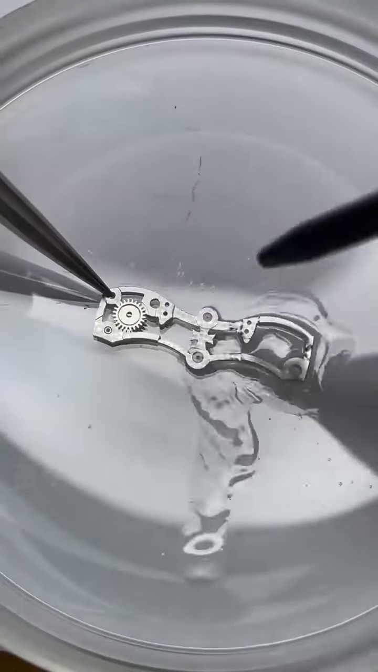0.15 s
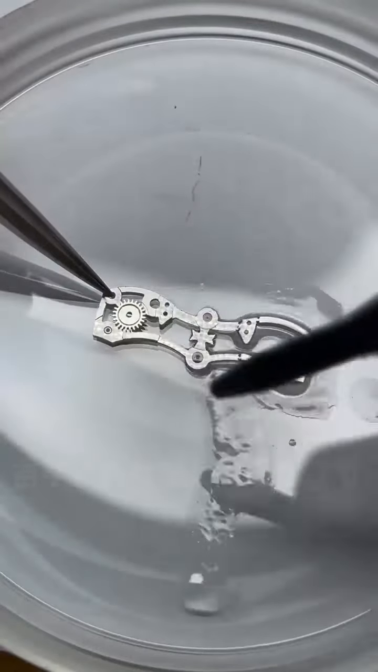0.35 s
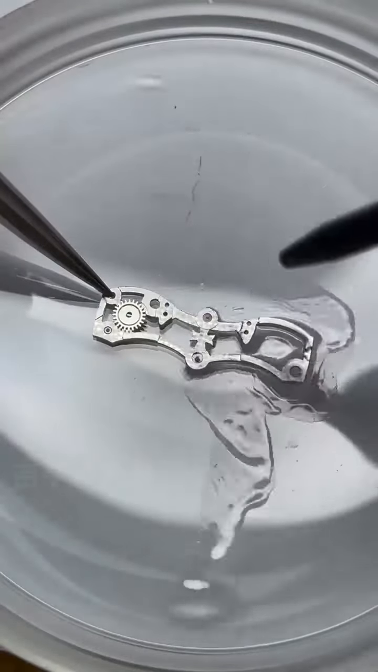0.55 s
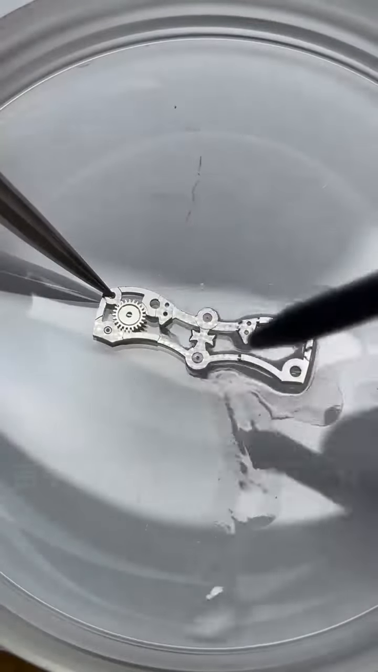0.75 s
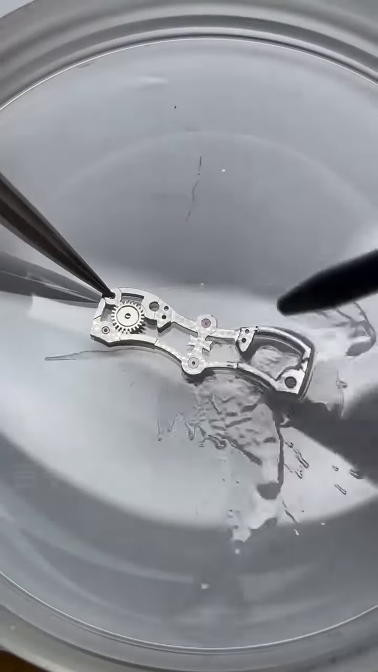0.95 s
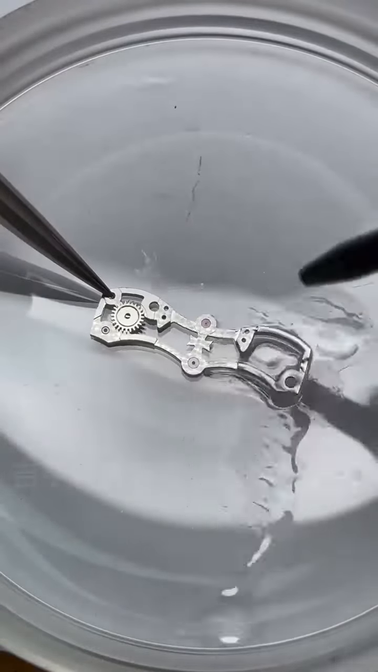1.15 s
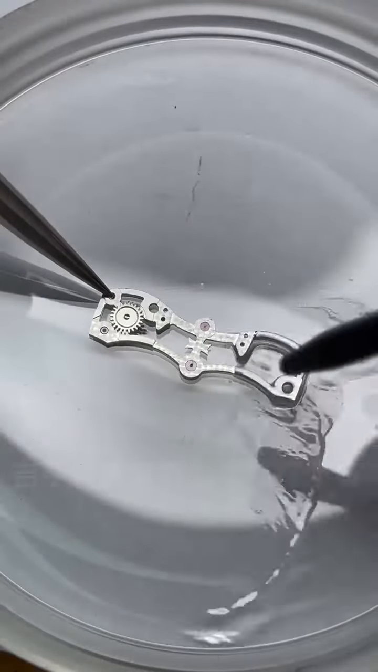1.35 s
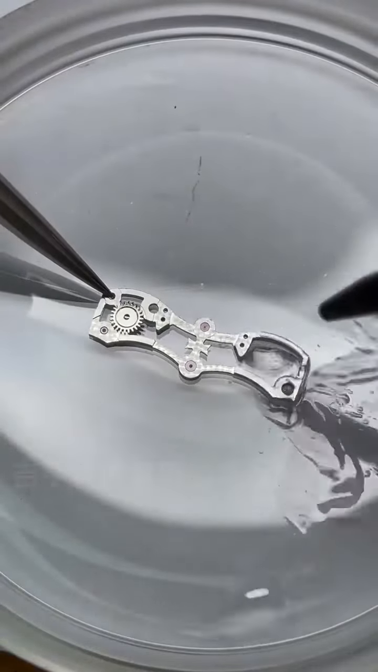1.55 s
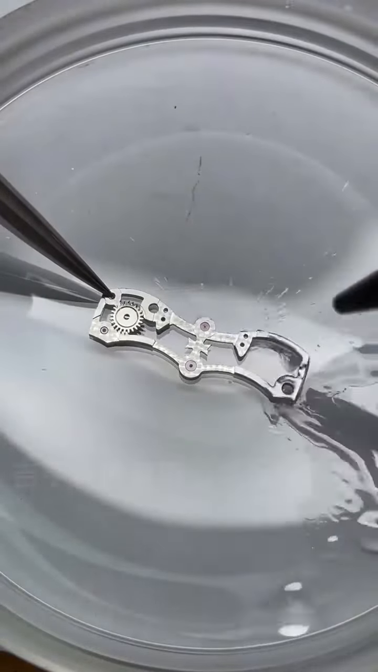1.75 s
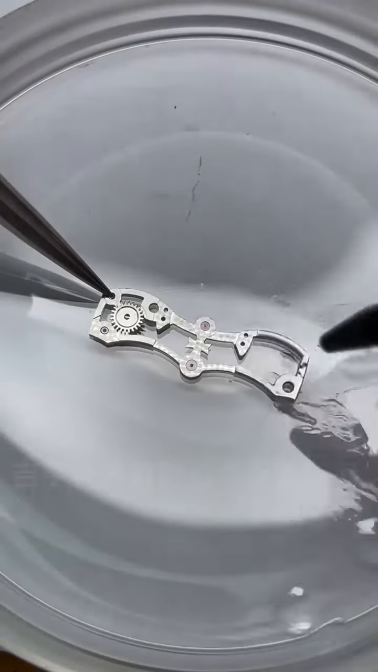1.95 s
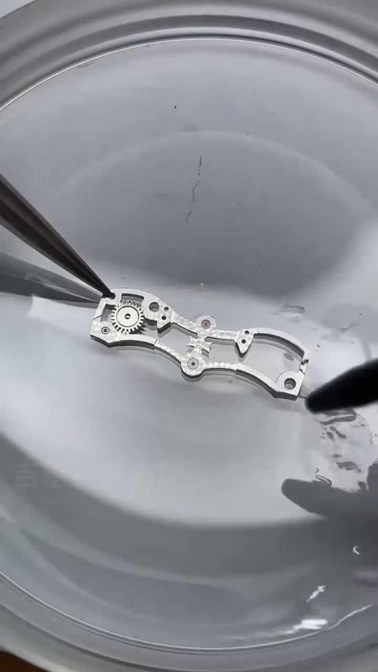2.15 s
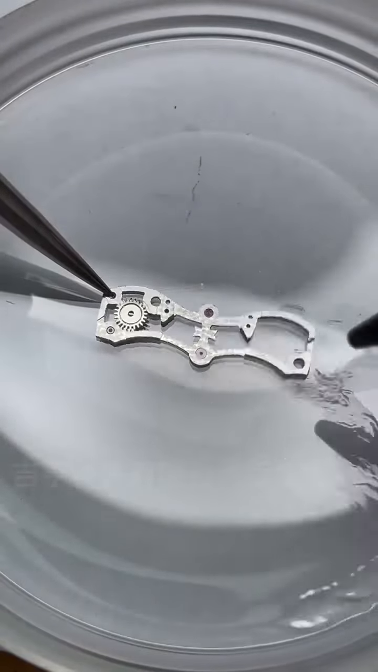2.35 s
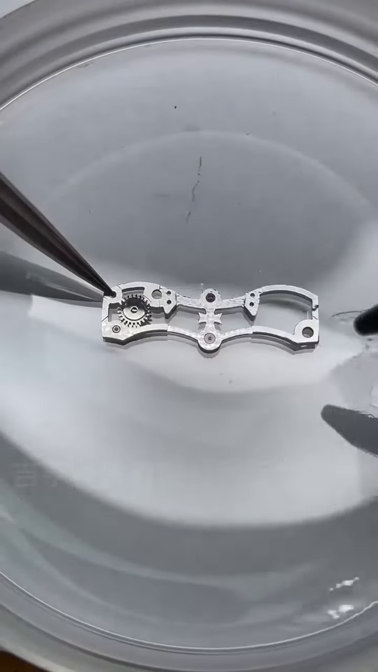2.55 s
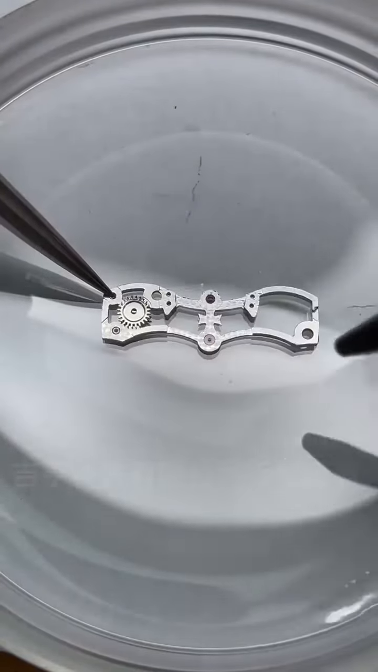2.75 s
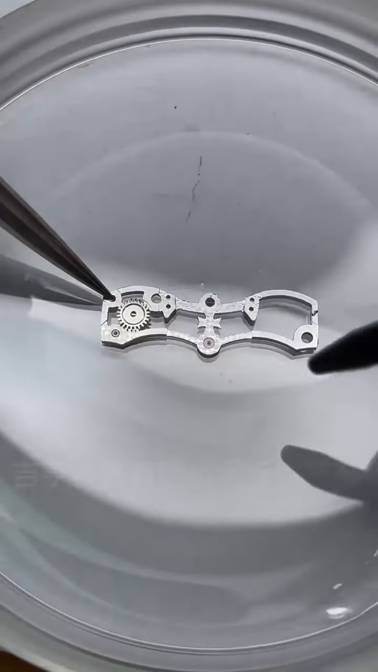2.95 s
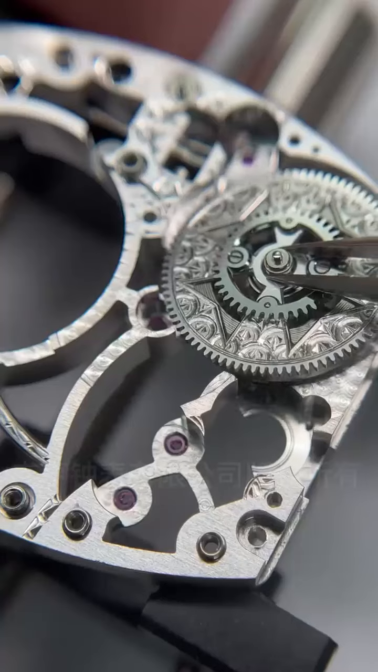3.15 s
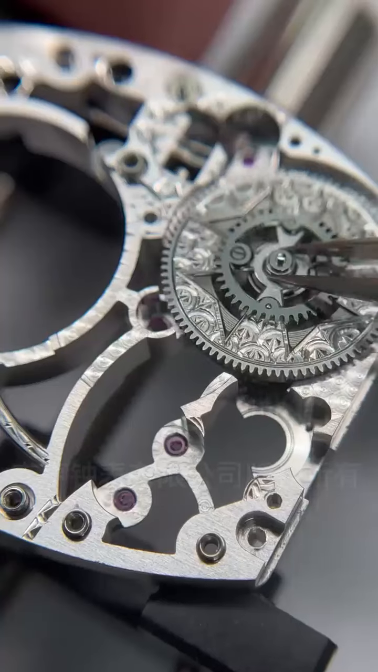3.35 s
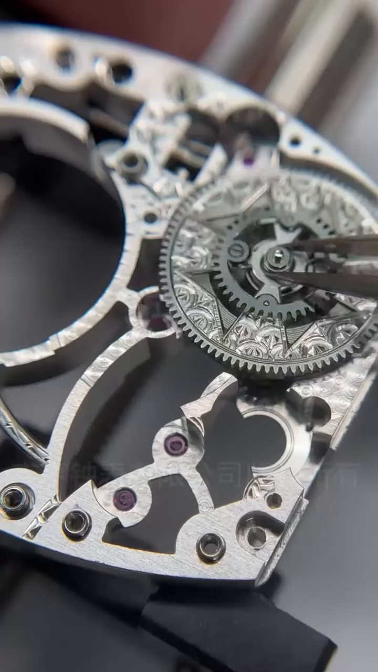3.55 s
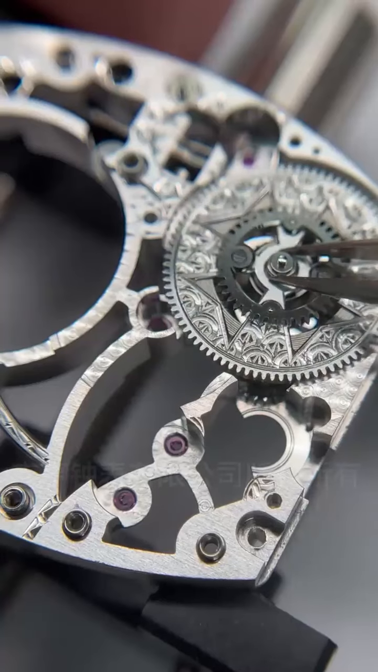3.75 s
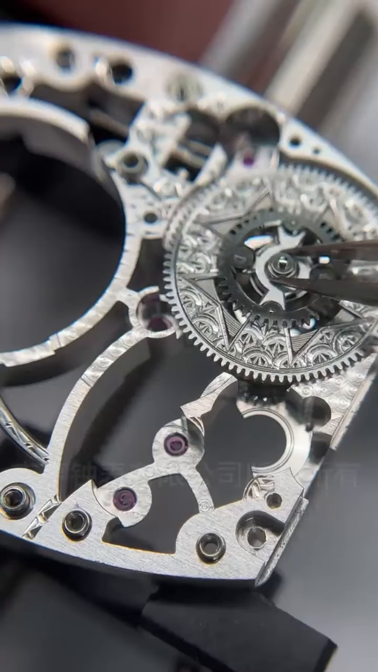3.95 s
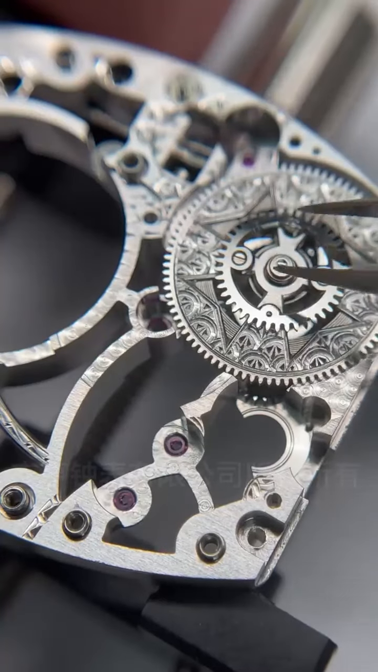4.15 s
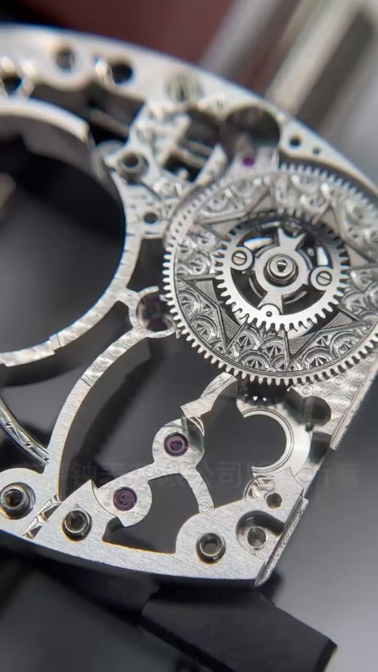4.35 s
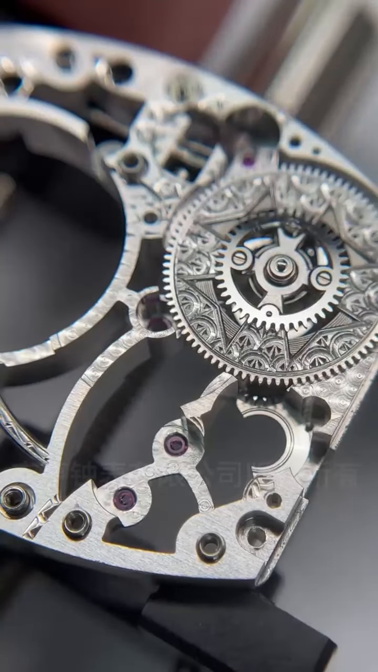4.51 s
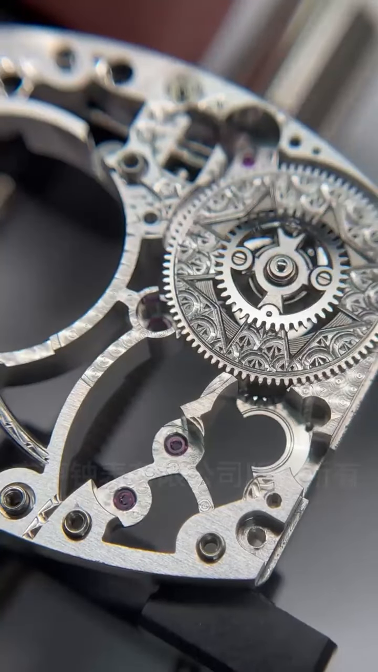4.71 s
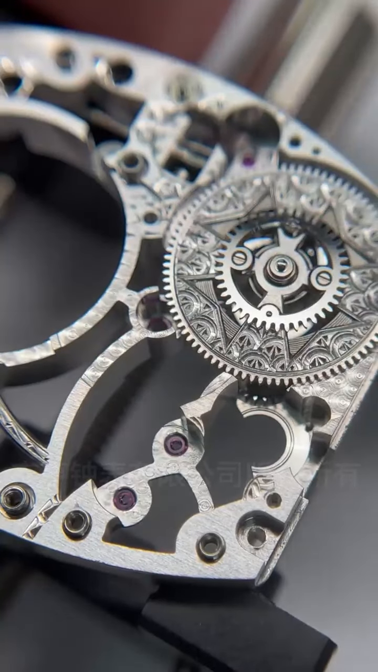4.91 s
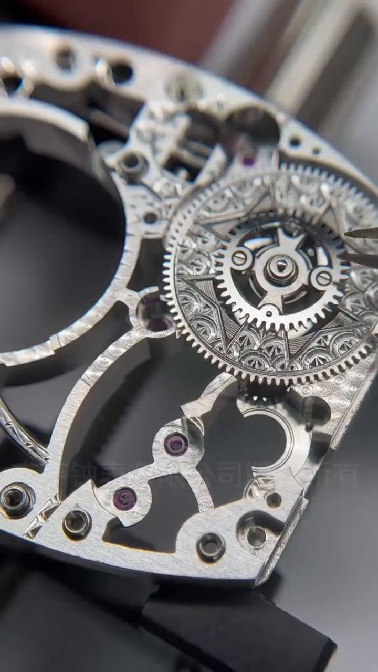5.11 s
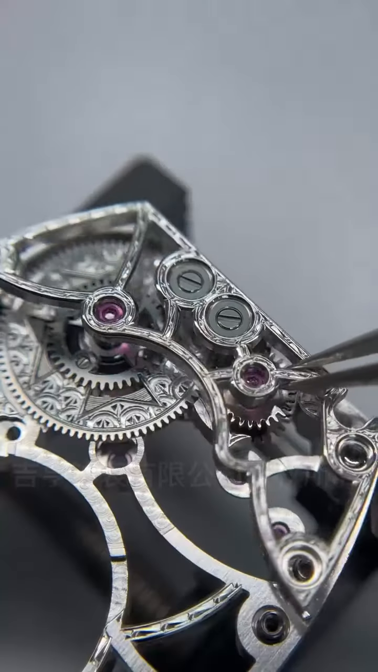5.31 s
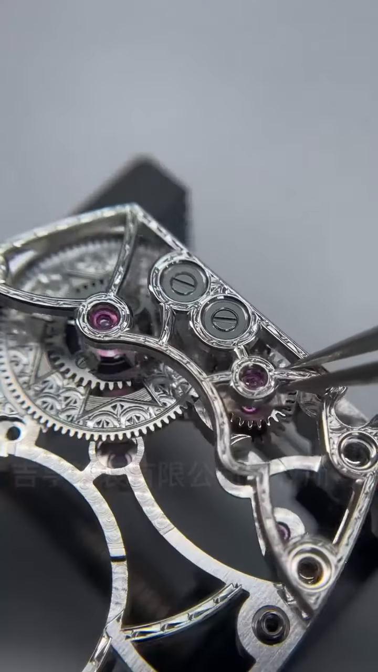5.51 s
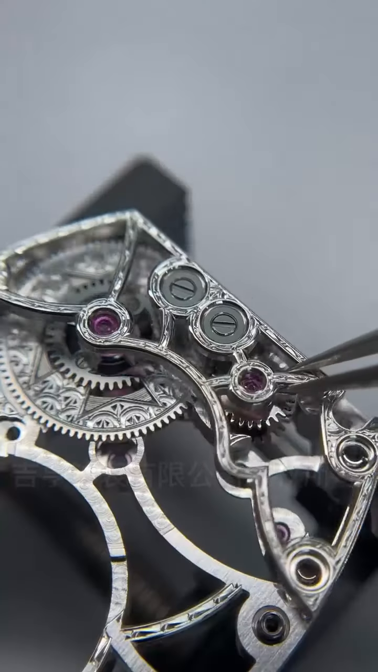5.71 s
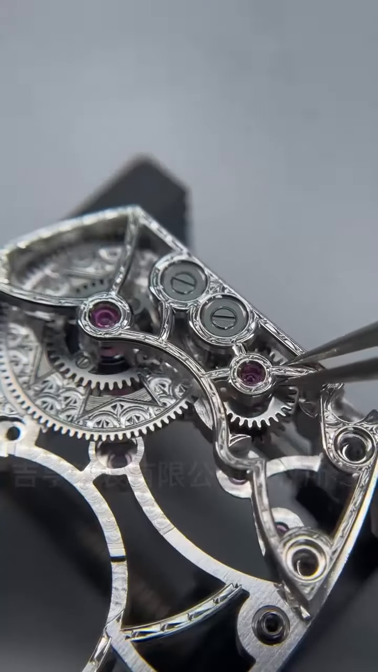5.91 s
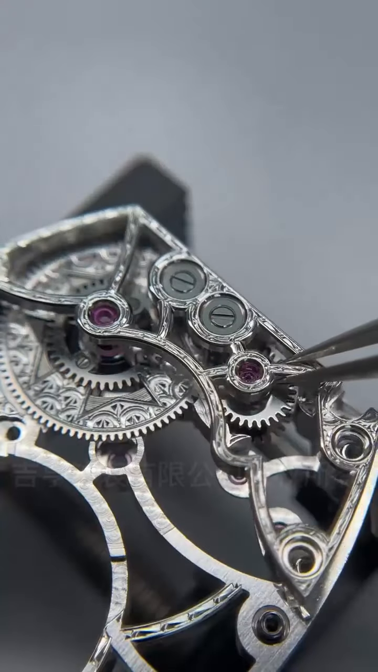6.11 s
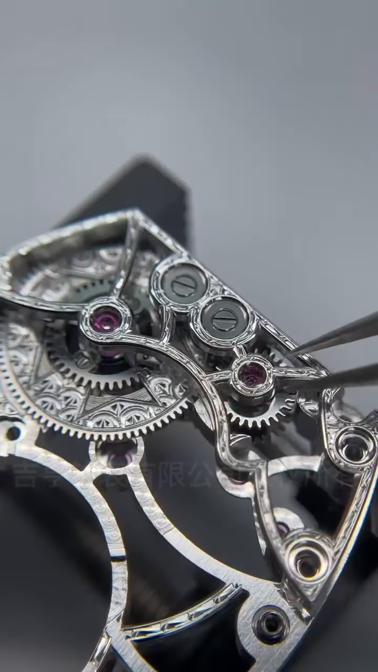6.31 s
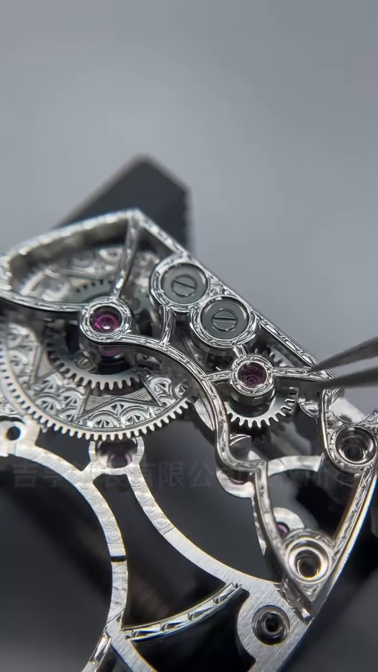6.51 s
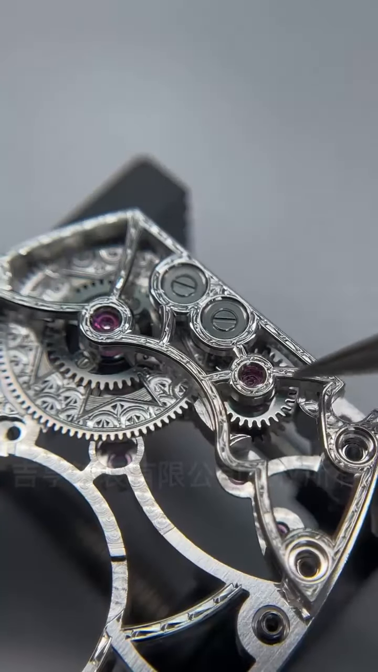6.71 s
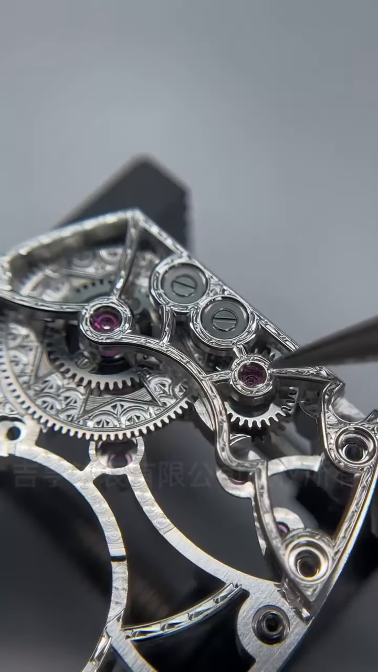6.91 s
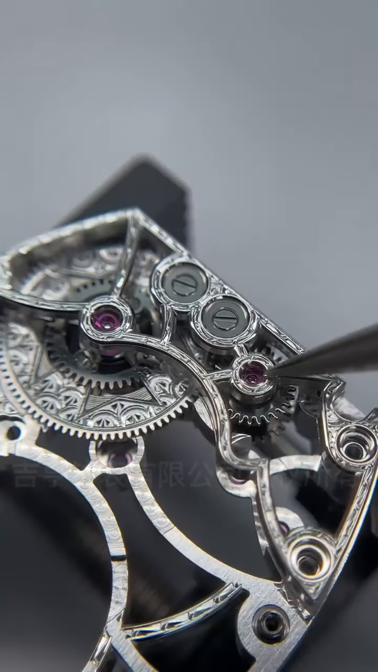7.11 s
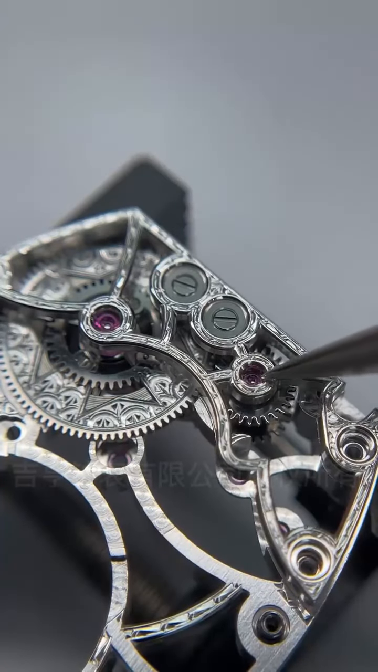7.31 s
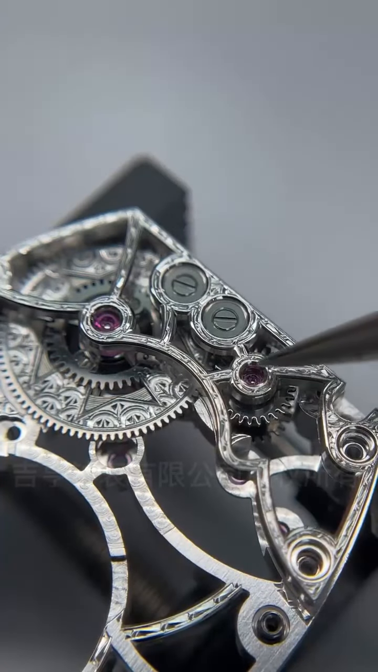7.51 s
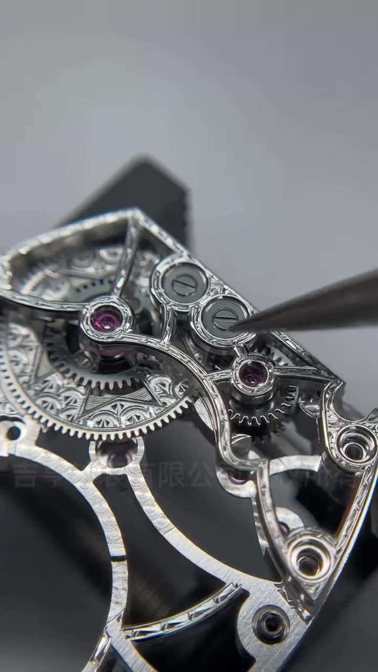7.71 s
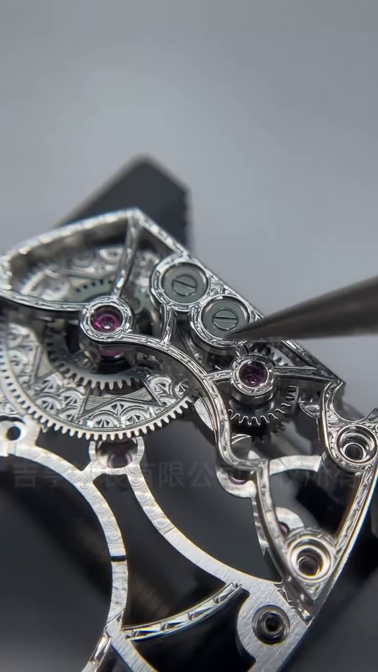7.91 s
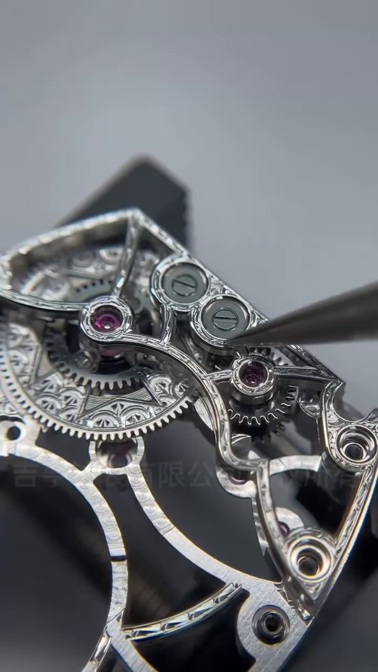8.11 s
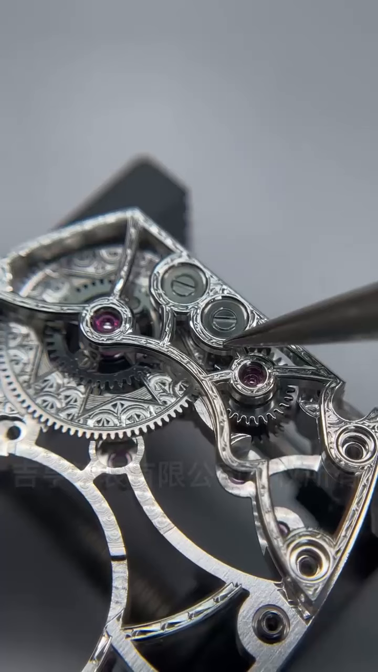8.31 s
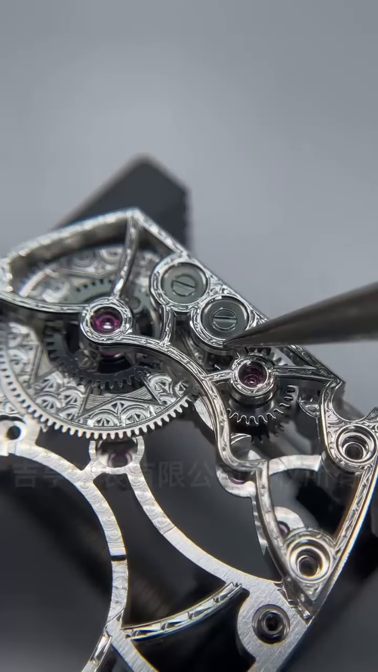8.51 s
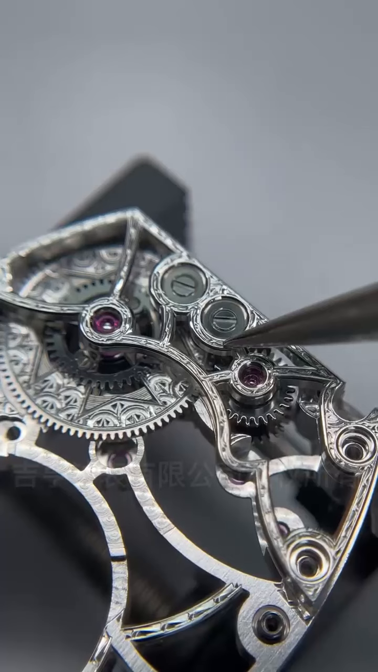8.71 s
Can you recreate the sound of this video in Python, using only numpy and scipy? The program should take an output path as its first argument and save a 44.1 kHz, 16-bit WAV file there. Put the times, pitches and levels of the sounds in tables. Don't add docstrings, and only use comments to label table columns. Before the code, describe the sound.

Nine quick, hissing scrubs in a wet dish cut to hushed room hum, where tweezers and a screwdriver click sparsely on delicate steel.

```python
import sys
import numpy as np
from scipy import signal
from scipy.fft import rfft, irfft, next_fast_len
from scipy.io import wavfile
from scipy.ndimage import uniform_filter1d, minimum_filter1d

SR = 44100
rng = np.random.default_rng(int(sys.argv[2]) if len(sys.argv) > 2 else 0)


def nominal_scale(level):
    x = np.asarray(level, float) / 20
    return 10 ** x


def waveform_to_disk(signal):
    frames = np.transpose(np.atleast_2d(signal))
    scaled = np.clip(frames, -1, 1) * 32767
    samples = np.round(scaled).astype(np.int16)
    wavfile.write(sys.argv[1], SR, samples)


N = 390725
T = np.arange(N) / SR


def noise(n=N):
    return rng.standard_normal(n)


def evened(x):
    return x / np.sqrt(np.mean(x ** 2) + 1e-20)


def slow_noise(samples):
    once = uniform_filter1d(noise(), samples)
    return evened(uniform_filter1d(once, samples))


def coloured(x, points):
    hz, db = np.transpose(points)
    size = next_fast_len(len(x))
    f = np.fft.rfftfreq(size, 1 / SR)
    curve_db = np.interp(np.log(f + 1), np.log(hz), db, -120, -120)
    return evened(irfft(rfft(x, size) * nominal_scale(curve_db), size)[:len(x)])


def add(mix, s, sound):
    part = mix[round(s * SR):][:len(sound)]
    part += sound[:len(part)]


def swells(steady_db, middle, length, db):
    bells = np.exp(-(4 * (T[::64, None] - middle) / length) ** 2 / 2)
    power = nominal_scale(2 * steady_db) + bells @ nominal_scale(2 * db)
    return np.repeat(np.sqrt(power), 64)[:N]


def grains(per_s, spread_db, clump_db, clump_s):
    slips = (rng.random(N) < per_s / SR) * noise()
    slips = slips * nominal_scale(spread_db * np.minimum(rng.exponential(1, N), 4))
    return slips * nominal_scale(clump_db * slow_noise(int(clump_s * SR)))


# start_s, length_s, fizz_db, rasp_db
BLASTS = [
    (0.085, 0.16, -25, -31.5),
    (0.429, 0.17, -25, -30.5),
    (0.748, 0.25, -23, -35),
    (1.085, 0.19, -23.5, -34.5),
    (1.405, 0.16, -23, -38.5),
    (1.672, 0.19, -24.5, -40.5),
    (1.938, 0.15, -22.5, -40),
    (2.233, 0.37, -23.5, -42.5),
    (2.592, 0.24, -24, -43.5),
]
# time_s, fizz_db, rasp_db
BETWEEN = [(0, -35, -45), (.3, -33.5, -44), (1.1, -27.5, -41), (2.2, -30, -42), (2.97, -30.5, -44.5)]


def blasting(column, change_db, lift_s):
    press_s = 0.039
    back = np.array(BETWEEN)
    power = nominal_scale(2 * np.interp(T, back[:, 0], back[:, column - 1]))
    for row in BLASTS:
        start, length, level_db = row[0], row[1], row[column]
        t = T - start
        touch = np.clip(t / press_s, 0, 1) * np.clip(1 - (t - length) / lift_s, 0, 1)
        progress = np.clip(t / length, 0, 1)
        blast = touch * nominal_scale(level_db + change_db * (progress - 1.5))
        power = np.maximum(power, blast ** 2)
    return uniform_filter1d(np.sqrt(power), 600)


# pitch_hz, level_db
FIZZ = [(7400, -38), (7850, -21), (8030, -6), (8350, -3), (9000, -4), (9500, -2.5), (9800, -4),
        (10050, -2.5), (11000, -6), (12000, -14.5), (13500, -22), (15450, -23.5), (15550, -60)]
# pitch_hz, level_db
WHISTLE = [(9500, -21.5), (9950, -1.5), (10120, 0), (10450, -5), (11000, -22)]


def fizz(slips):
    film = nominal_scale(-9 + 4.5 * (T - 4.0)) * coloured(slips, WHISTLE)
    blasts = blasting(column=2, change_db=3.5, lift_s=0.016)
    return nominal_scale(6.0) * blasts * (coloured(slips, FIZZ) + film)


# pitch_hz, width_hz, lift_db
PART = [(2775, 86, 5), (3426, 220, -2.5), (3996, 35, 3), (5350, 54, -0.5), (5940, 390, 6.5),
        (6250, 64, 3.5), (7060, 68, 2), (7145, 54, 2.5), (7417, 180, 6.5)]


def ringing(x):
    size = next_fast_len(N)
    f = np.fft.rfftfreq(size, 1 / SR)
    lift_db = sum(db / (1 + (2 * (f - hz) / width) ** 2) for hz, width, db in PART)
    return evened(irfft(rfft(x, size) * nominal_scale(lift_db), size)[:N])


# pitch_hz, level_db
RASP = [(300, -37.5), (1300, -21), (2000, -19), (3200, -7.5), (4000, -3), (4600, -6), (4800, -1),
        (5900, -4), (6400, -5), (7000, 2), (7900, -6), (9000, 2), (13000, -23), (15500, -28)]


def rasp(slips):
    blasts = blasting(column=3, change_db=-2, lift_s=.06)
    return nominal_scale(0.5) * blasts * ringing(coloured(slips, RASP))


# pitch_hz, level_db
SPRAY = [(900, -39), (1400, -6), (1900, -0.5), (2100, -3), (4000, 0.5), (7800, -4), (9000, -13.5),
         (15500, -16)]
# time_s, level_db
WETNESS = [(0, -1), (.45, 0), (.8, 1.5), (1.35, 3), (1.7, 0), (2.3, -1), (2.38, 1.5), (2.78, 1.5),
           (2.86, -1), (2.97, -2)]


def spray():
    level_db = -44.5 - 2.5 * (T - 2.0) + np.interp(T, *np.transpose(WETNESS))
    return nominal_scale(level_db) * coloured(noise(), SPRAY)


# middle_s, length_s, level_db
GUSTS = [(0.032, 0.065, -50), (0.328, .14, -54), (0.517, 0.062, -56.5), (0.658, .12, -55),
         (0.828, 0.18, -56.5), (1.012, 0.16, -49.5), (1.208, 0.14, -52), (1.346, 0.11, -49),
         (1.435, 0.11, -56), (1.637, 0.13, -52.5), (1.863, 0.088, -58), (1.965, .1, -57), (2.13, 0.18, -59),
         (2.294, 0.12, -67), (2.44, .12, -57), (2.618, 0.2, -60), (2.798, 0.27, -63)]


def gusts():
    return swells(-65, *np.transpose(GUSTS))


# pitch_hz, level_db
WIND = [(15, -53.5), (25, -12), (80, -2.5), (135, -14), (162, -14), (194, -29.5), (300, -33.5),
        (390, -53.5), (660, -120)]


def wind(gust):
    return nominal_scale(6.5) * gust * coloured(noise(), WIND)


# pitch_hz, level_db
SLOSH = [(120, -15), (200, -7), (500, -1), (1200, -3), (2000, -25.5)]


def slosh(gust):
    laps = grains(per_s=2100, spread_db=2.5, clump_db=1.5, clump_s=0.0046)
    follow = (gust / nominal_scale(-57)) ** .4
    return nominal_scale(-57 - 0.5 * (T - 0.5)) * follow * coloured(laps, SLOSH)


def puff(db, sharp_db, flutter_db, sink_ms, chance):
    t, sink = np.arange(2200) / SR, max(sink_ms, .5) / 1000
    hz = 95 + 60 * chance[0] + 1300 * np.exp(-t / sink) + 260 * np.exp(-t / (3.1 * sink))
    front = nominal_scale(sharp_db) * np.exp(-t / sink)
    body = t / sink * np.exp(-t / (2.0 * sink))
    flutter = nominal_scale(flutter_db) * np.exp(-t / 0.024) * np.minimum(t / 0.025, 1) ** 2
    swell = (front + body + flutter) * np.minimum(t / 0.00013, 1)
    wobble = np.cumsum(uniform_filter1d(noise(len(t)), 40)) * 0.11
    return nominal_scale(db + 2.0) * swell * np.sin(2 * np.pi * (np.cumsum(hz) / SR + chance[1]) + wobble)


# start_s, peak_db, flutter_db
PUFFS = [(0.015, -34.5, -1), (0.046, -45.5, -10), (0.159, -44, 0.5), (0.293, -42, 8.5), (.321, -36, -4),
         (0.365, -34.5, -7.5), (0.489, -32, -16.5), (0.52, -46, -6.5), (0.631, -42.5, 1), (0.654, -43, 2.5),
         (.67, -41.5, -4), (0.725, -41.5, 2.5), (0.788, -40.5, -15.5), (.809, -42, -6), (0.879, -48.5, -5),
         (0.97, -41, 3), (.984, -37.5, -6), (1.004, -43, -5.5), (1.06, -41, 1.5), (1.111, -42.5, -5),
         (1.182, -53.5, -3.5), (1.234, -49, -2), (1.344, -42, -3), (1.39, -45.5, -17), (1.441, -48, 8),
         (1.666, -42, 5), (1.725, -42.5, -9.5), (2.087, -46.5, -6.5), (2.347, -55, -8), (2.376, -47.5, 6)]


def puffs(gust):
    out, small = np.zeros(N), np.zeros(N)
    for s, db, flutter_db in PUFFS:
        sharp_db = -7.5 + 0.34 * (db + 43)
        add(out, max(s - .001, 0), puff(db, sharp_db, flutter_db, 2.2, rng.random(2)))
    for when, size, sharp, sink, *chance in rng.random((220, 6)):
        one = puff(-14 * size, -6 + 12 * sharp, -4.5, 0.52 + 2.0 * sink, chance)
        add(small, when * CUTS[0], one)
    return out + nominal_scale(6.5) * gust * small


# start_s, peak_db
FLICKS = [
    (0.241, -9),
    (0.516, -12),
    (0.7874, -8.5),
    (2.7569, -10.5),
]


def flicks():
    out, t = np.zeros(N), np.arange(400) / SR
    for s, db in FLICKS:
        burst = coloured(noise(len(t)), FIZZ) * np.minimum(t / 0.00024, 1) * nominal_scale(-60 * t / 0.0055)
        add(out, s, nominal_scale(db) * burst / abs(burst).max())
    return out


# start_s, peak_db, pitch_hz
DROPS = [(1.554, -40, 1000), (1.7305, -38.5, 1500), (1.773, -42, 2200), (1.835, -43.5, 1880),
         (2.1548, -38, 1500), (2.35, -42, 900), (2.3605, -39.5, 1800), (2.376, -37, 1500),
         (2.4153, -35.5, 1290), (2.525, -41, 1400), (2.6006, -40, 1200), (2.607, -42, 1800),
         (2.6356, -36.5, 1900), (2.6723, -42, 1700), (2.7807, -43, 1500), (2.8004, -40, 1600),
         (2.851, -43, 1500), (2.894, -42.5, 2500), (2.9227, -38.5, 1670)]


def drops():
    out, t = np.zeros(N), np.arange(300) / SR
    t60_s = .004
    for s, db, hz in DROPS:
        rising_hz = hz * (0.77 + 1.5 * t / t60_s)
        click = .4 * uniform_filter1d(noise(len(t)), size=6)
        pat = np.sin(2 * np.pi * np.cumsum(rising_hz) / SR) + click
        add(out, s, nominal_scale(db + 3.5 - 60 * t / t60_s) * np.minimum(t / .0002, 1) * pat)
    return out


def air_jet():
    slips = grains(per_s=16000, spread_db=1.0, clump_db=0.3, clump_s=0.00081)
    gust = gusts()
    brush = fizz(slips) + rasp(slips) + flicks()
    liquid = spray() + slosh(gust) + drops()
    air = wind(gust) + puffs(gust)
    return brush + liquid + air


# middle_s, length_s, deep_db, bass_db
RUMBLES = [(3.095, 0.33, -54, -70), (3.698, 1, -56, -54.5), (4.101, 0.28, -59, -61.5),
           (4.698, 0.33, -52.5, -52.5), (5.302, 0.37, -59.5, -53.5), (6.293, 0.48, -50, -54.5),
           (6.948, 0.19, -55, -70.5), (7.34, 0.22, -51.5, -54.5), (7.757, 0.38, -46.5, -69),
           (8.4, 0.49, -56, -66), (8.55, 0.25, -58.5, -54.5)]
# pitch_hz, level_db
DEEP = [(22, -22.5), (34, -13), (48, 6), (62, -10.5), (72, -30)]
# pitch_hz, level_db
BASS = [(52, -24), (64, 4.5), (92, 3), (120, -5.5), (150, -7.5), (190, -3.5), (220, -10.5)]


def rumble(deep_db, bass_db):
    middle, length, deep_swell_db, bass_swell_db = np.transpose(RUMBLES)
    lumps = nominal_scale(1.5 * evened(uniform_filter1d(noise(), 3000)))
    deep = swells(deep_db, middle, length, deep_swell_db) * coloured(noise(), DEEP)
    bass = swells(bass_db, middle, length, bass_swell_db) * coloured(noise(), BASS)
    return lumps * (deep + bass)


# pitch_hz, level_db
CAPSULE = [(1500, -23), (3000, -13.5), (5000, -13), (7500, -9.5), (8600, -10), (9600, -5.5), (11500, -15),
           (12500, -38)]


def room(colour, hum_db, deep_db, bass_db):
    swell = nominal_scale(1.1 * evened(uniform_filter1d(noise(), 4000)))
    hum = nominal_scale(hum_db) * swell * coloured(noise(), colour)
    air = coloured(noise(), [(1200, 3), (1600, 2), (2000, -6.5), (2500, -17.5)])
    air = nominal_scale(hum_db - 32.5) * nominal_scale(1.3 * slow_noise(9000)) * air
    return hum + air + rumble(deep_db, bass_db) + nominal_scale(-85) * coloured(noise(), CAPSULE)


# pitch_hz, width_hz, level_db
FAN = [(146, 9.2, -60.5), (265, 21, -66), (359, 4.8, -66), (449, 4.8, -72.5), (621, 32, -82.5),
       (811, 30, -72.5), (995, 49, -71.5)]


def fan():
    out, turns = 0, np.cumsum(1 + 0.00595 * slow_noise(12000)) / SR
    for hz, width, db in FAN:
        r = np.exp(-np.pi * width / SR)
        slow = signal.lfilter([1], [1, -2 * r, r * r], noise() + 1j * noise())
        tone = evened((slow * np.exp(2j * np.pi * hz * turns)).real)
        sag_db = -11 * (hz < 200) * np.clip((T - 7.3) / 0.13, 0, 1)
        out = out + nominal_scale(db + sag_db) * tone
    return out


def ring(modes, t, t60, chance, crack_share, force_db):
    hz, db = np.array(modes, float).T
    db = db + 1.1 * min(force_db + 31, 0) * (hz > 12700)
    db = db + .7 * min(force_db + 44, 0) * (hz > 11200)
    shift, phase, touch = chance[:len(hz)].T
    rung_hz = hz * (1 + 0.027 * (shift - .5))
    waves = np.sin(2 * np.pi * (np.outer(rung_hz, t) + phase[:, None]))
    tones = nominal_scale(db - 10 * crack_share * touch) @ waves
    edge_low, edge_high = (hz[0] * .85, db[0] - 9), (hz[-1] * 1.07, db[-1] - 9)
    crack = coloured(noise(len(t)), [edge_low, *zip(hz, db), edge_high])
    crack = crack_share * crack * nominal_scale(-60 * 0.3 * t / t60)
    touching = np.sin(np.pi / 2 * np.minimum(t / .0005, 1)) ** 2
    sound = (evened(tones) + crack) * nominal_scale(-60 * t / t60) * touching
    return sound / abs(sound).max()


def touches(rows, low, mid, high, t60_s, thud_db, crack=1, low_longer=1.4):
    out, t = np.zeros(N), np.arange(2400) / SR
    thud = nominal_scale(thud_db) * np.sin(2 * np.pi * 420 * t) * nominal_scale(-60 * t / 0.029)
    for (s, db, low_db, high_db), chance in zip(rows, rng.random((len(rows), 8, 3))):
        steel = ring(mid, t, t60_s, chance, crack, db)
        steel = steel + nominal_scale(low_db) * ring(low, t, low_longer * t60_s, chance, crack, db)
        steel = steel + nominal_scale(high_db) * ring(high, t, 0.96 * t60_s, chance, crack, db)
        add(out, s, nominal_scale(db) * (steel + thud))
    return out


# start_s, peak_db, low_ring_db, high_ring_db
LOOSE = [
    (3.0409, -57, -1, 3),
    (3.0567, -47.5, -3.5, 1.5),
    (3.0622, -57, 0, -8),
    (3.1086, -74, 0, -3),
    (3.1575, -67, 2, -1),
    (3.1632, -70, 5, -4),
    (3.2814, -63, 2, -5),
    (3.2865, -66, -3, -6),
    (3.3025, -70, -4, -6),
]
# pitch_hz, level_db
LOOSE_LOW = [(1900, -1), (2900, -6), (4050, -1), (4500, -6)]
LOOSE_MID = [(5330, 1), (6140, -4.5), (6950, -2), (7760, 0), (8500, -14)]
# pitch_hz, level_db
WHEEL_HIGH = [(9510, 3), (9930, -3), (10420, -3), (10880, -10), (11780, -15), (12450, -24), (13600, -29.5),
              (15300, -33)]


def loose_wheel():
    return touches(LOOSE, LOOSE_LOW, LOOSE_MID, WHEEL_HIGH, t60_s=0.017, thud_db=-5)


# start_s, peak_db, low_ring_db, high_ring_db
WHEEL = [
    (3.3246, -62.5, -7, 15),
    (3.3409, -66, 1, 8),
    (3.3503, -47.5, -5, 6),
    (3.7254, -53, -12, -6),
    (4.0233, -65.5, -6, 5),
    (4.0784, -60, 0, -3),
]
# pitch_hz, level_db
WHEEL_LOW = [(960, 4), (1620, 3), (1880, 4), (2270, 3), (3030, 1.5), (4120, -6), (4520, -2)]
WHEEL_MID = [(5370, -9), (6140, -8), (6950, -4), (7760, 10), (8500, -6)]


def wheel_seating():
    return touches(WHEEL, WHEEL_LOW, WHEEL_MID, WHEEL_HIGH, t60_s=0.017, thud_db=-5)


# start_s, peak_db, low_ring_db, high_ring_db
WHEEL_SNAPS = [
    (3.7183, -45.5, -13, 6),
    (3.7196, -40, -6.5, 2.5),
    (4.0512, -31, -12.5, -0.5),
    (4.0543, -44, -23, 6),
]
# pitch_hz, level_db
SEATED_LOW = [(1610, -1), (1900, -2), (2280, -3), (3030, -4), (4000, -10), (4180, -1), (4500, -5)]
SEATED_MID = [(5350, -26), (6140, -19), (6890, -6), (7760, 2.5), (8500, -2)]
SEATED_HIGH = [(9510, -2), (9940, 1.5), (10420, -6.5), (10880, -9), (11780, -18), (12450, -16),
               (13600, -27), (15000, -26)]


def wheel_snaps():
    return touches(WHEEL_SNAPS, SEATED_LOW, SEATED_MID, SEATED_HIGH, t60_s=0.012, thud_db=-12.5,
                   crack=0.37, low_longer=2.2)


# start_s, peak_db, low_ring_db, high_ring_db
BRIDGE = [(5.6605, -70.5, -12, 7), (5.7445, -77, -3.5, 5), (5.9046, -75, -3, 8), (5.9252, -51, -19.5, 3),
          (5.929, -54, -17, -9), (6.0031, -77.5, -1.5, 3), (6.0613, -59, -18, 11.5), (6.1338, -59, -12, 11),
          (6.1465, -32, -21, 1), (6.1795, -54, -14, 10), (6.1812, -45, -18, 1), (6.1842, -35.5, -22, 3),
          (6.1982, -44, -20, 1), (6.2048, -53.5, -5, -4), (6.2145, -58, -20, -1), (6.2183, -35, -25, -3.5),
          (6.2205, -36, -19, -0.5), (6.2295, -47, -14, -1), (6.54, -69, -2, 4), (7.0068, -53, -17, -6.5),
          (7.013, -56, -7.5, -8.5)]
# pitch_hz, level_db
STEEL_LOW = [(1650, 0), (2050, -9), (2400, 3), (2950, 3), (3300, -5), (3700, 5), (4200, -1), (4700, 7)]
STEEL_MID = [(5380, -14.5), (5980, -16), (6700, -4), (7150, 1), (7630, 10), (8400, 4)]
STEEL_HIGH = [(9650, 2), (10100, -11), (10630, -4.5), (11350, -14.5), (11900, -9), (13100, -24),
              (14100, -27), (14950, -29)]


def bridge_ticks():
    return touches(BRIDGE, STEEL_LOW, STEEL_MID, STEEL_HIGH, t60_s=0.022, thud_db=-17)


# start_s, peak_db, low_ring_db, high_ring_db
SNAPS = [
    (6.138, -30, -19, 0),
    (6.1432, -31, -22, 4.5),
]


def bridge_snaps():
    return touches(SNAPS, STEEL_LOW, STEEL_MID, STEEL_HIGH, t60_s=0.0093, thud_db=-12.5, crack=0.37)


# start_s, peak_db, low_ring_db, high_ring_db
DRIVER = [
    (8.1699, -32, -23, -2.5),
    (8.1728, -54, -21, 0),
]
# pitch_hz, level_db
DRIVER_LOW = [(2400, -8), (2900, -3), (3400, -2), (3750, 0), (4700, -3)]
DRIVER_MID = [(5050, -12), (5400, -10), (5980, -2), (6870, -5), (7290, -1), (7640, 12.5), (8300, -6),
              (8900, -10)]
DRIVER_HIGH = [(9730, -2), (10680, 0.5), (10900, -3), (11400, -9), (11800, -10), (13100, -20), (14100, -28)]


def screwdriver():
    return touches(DRIVER, DRIVER_LOW, DRIVER_MID, DRIVER_HIGH, t60_s=0.0093, thud_db=-12.5, crack=0.37)


def ticks():
    wheel = loose_wheel() + wheel_seating() + wheel_snaps()
    out = wheel + bridge_ticks() + bridge_snaps() + screwdriver()
    late = np.arange(SR // 2) / SR
    tail = coloured(noise(len(late)), [(100, 2), (3000, 0.5), (5500, -4), (7600, -6), (8800, -7),
                                       (10400, -5), (11500, -9), (13000, -22)])
    tail = tail * nominal_scale(-60 * late / 0.24) * np.minimum(late / 0.0036, 1)
    echo = signal.oaconvolve(out, tail / np.linalg.norm(tail))[:N]
    return out + nominal_scale(-17.0) * echo


CUTS = [2.972, 5.1885]
# pitch_hz, level_db
ROOM_A = [(170, -20), (200, -3.5), (274, 2.5), (325, -5.5), (390, -8.5), (735, -15), (1060, -15),
          (1150, -20.5), (1800, -26), (2000, -29), (2250, -32), (2500, -39.5), (3500, -49)]
ROOM_B = [(170, -20), (200, -12.5), (271, 1.5), (329, -8), (441, -13), (667, -14), (717, -20.5),
          (1060, -18), (1150, -30.5), (1650, -35), (1850, -46), (2500, -46.5), (3500, -57)]
# pitch_hz, level_db
APART = [(25, -4), (50, 2), (150, -6), (300, -6), (500, -6), (750, -4), (950, -15), (1500, -18),
         (2500, -45)]
# pitch_hz, level_db
SPLASH_APART = [(150, -12), (300, -3.5), (700, 2), (1250, -1.5), (1600, -8.5), (2400, -10), (2800, -24)]


def scene():
    first, second = CUTS
    dish = np.where(T < first, 1, nominal_scale(-8.0) * np.clip(1 - (T - first) / 0.015, 0, 1))
    bench_a = np.clip((T - first) / 0.013, 0, 1) * np.clip((second - T) / 0.0016, 0, 1)
    bench_b = np.clip((T - second) / 0.023, 0, 1) * np.clip((T[-1] - T) / 0.0055, 0, 1)
    fan_hum, steel = fan(), ticks()
    mono = dish * air_jet() + steel
    mono = mono + bench_a * (room(ROOM_A, hum_db=-56.5, deep_db=-57, bass_db=-53.5) + fan_hum)
    mono = mono + bench_b * (room(ROOM_B, hum_db=-58.5, deep_db=-57.5, bass_db=-54) + fan_hum)
    apart = nominal_scale(-67.0) * (bench_a + bench_b) * coloured(noise(), APART)
    apart = apart + nominal_scale(-19) * steel
    apart = apart + dish * nominal_scale(-60 - 8 * T) * coloured(noise(), SPLASH_APART)
    return np.array([mono + apart, mono - apart])


# pitch_hz, lead_turns
PORTS = [(0, 0), (1800, 0), (2400, -.07), (3800, -.09), (4500, -.2), (4700, -.3), (4860, -.5), (5020, -.7),
         (5200, -.79), (5500, -.93), (5900, -1), (6500, -1.15), (7200, -1.24), (7900, -1.33), (9100, -1.5),
         (12300, -2), (13600, -2), (14500, -2.36), (15400, -2.45), (16000, -2.5)]


def two_ports(dry):
    size = next_fast_len(N + 4096)
    turns = np.interp(np.fft.rfftfreq(size, 1 / SR), *np.transpose(PORTS))
    half = np.exp(1j * np.pi * turns)
    return irfft(rfft(dry, size) * np.array([1 / half, half]), size)[:, :N]


# pitch_hz, side_limit_db, mid_limit_db
GIVE_UP = [(0, -9, -30), (2400, -7, -25), (3400, -5, -22), (4400, -2, -20), (4700, -8, -22),
           (5300, -8, -20), (5500, -5, -20), (6300, -5, -20), (6900, -12, -20), (8300, -12, -19),
           (9100, -12, -8), (9900, -12, -17), (11000, -20, -20), (11600, -15, -20), (11900, -2, -20),
           (13800, -6, -20), (14400, -6, -8), (14900, -8, -11), (15200, -8, -11), (15450, -8, -3),
           (16000, -8, -3)]
# start_s, length_s
DROPOUTS = [(.345, .02), (.66, .015), (.71, .04), (1.06, .01), (1.35, .06), (1.815, .02), (1.89, .06),
            (2.125, .04), (2.325, .155), (2.56, .035), (2.63, .01), (2.725, .01), (2.95, .02)]
VALLEYS = [2090, 2400, 2560, 3340]


def thin_out(ports):
    mid_side = np.array([ports[0] + ports[1], ports[0] - ports[1]]) / 2
    hz, when, z = signal.stft(mid_side, SR, nperseg=2048)
    column = hz[:, None]
    band = np.arange(len(hz)) // 10
    power = np.add.reduceat(abs(z) ** 2, np.arange(0, len(hz), 10), axis=1)[:, band]
    loud = minimum_filter1d(power.sum((0, 1)), 5) > 2e-4

    f, side_db, mid_db = np.transpose(GIVE_UP)
    limit_db = np.array([np.interp(hz, f, mid_db), np.interp(hz, f, side_db)])[:, band * 10, None]
    luck = uniform_filter1d(rng.standard_normal((2, band[-1] + 1, len(loud))), 3, 2)
    luck = evened(uniform_filter1d(luck, 3, 1))[:, band]
    weak = power < nominal_scale(2 * (limit_db + 3.2 * luck)) * power.sum(0)
    dropped = sum(abs(when - s - d / 2) < d / 2 + .013 for s, d in DROPOUTS)
    weak[0] |= np.outer((hz > 4680) & (hz < 5100), dropped) > 0

    small = (abs(z) ** 2 < np.where(column > 7500, .06, .045) * power) & (column > 1400)
    chance = uniform_filter1d(rng.standard_normal((len(hz) // 3 + 1, len(loud))), 5, 1)
    chance = chance[np.arange(len(hz)) // 3]
    in_valley = sum(abs(column - v) < 45 for v in VALLEYS)
    masked = chance > 1.2 - .9 * in_valley - .4 * (abs(column - 2800) < 1100)
    weak[0] |= (chance > -.15) & (abs(column - 4860) < 60)

    cancelled = (abs(column - 9030) < 700) | (abs(column - 4880) < 170)
    unlucky = luck[0] > np.where(column > 7000, -1.2, .3)
    z[0] *= ~((power[0] < 8e-12) & unlucky & cancelled)

    grain = rng.standard_normal(z.shape) + 1j * rng.standard_normal(z.shape)
    rough = 1 + 0.58 * loud * np.clip(column / 5000, 0, 1) * grain
    kept = ~(loud & (weak | small | masked))
    mid, side = signal.istft(z * rough * kept, SR, nperseg=2048)[1][:, :N]
    return np.array([mid + side, mid - side])


def low_pass(x):
    return signal.sosfilt(signal.butter(12, 15720, fs=SR, output="sos"), x)


def record(dry):
    mix = thin_out(two_ports(dry))
    return low_pass(mix)


dry = scene()
out = record(dry)
waveform_to_disk(out)
```